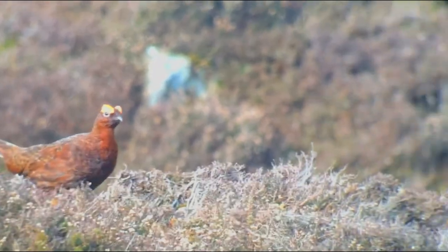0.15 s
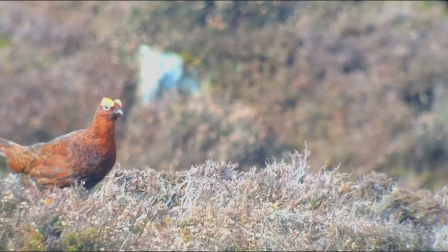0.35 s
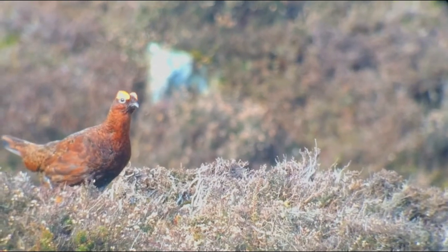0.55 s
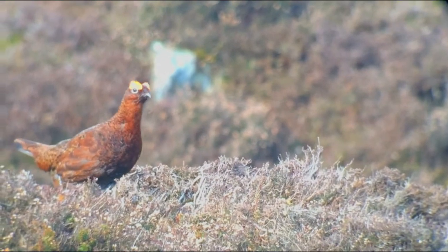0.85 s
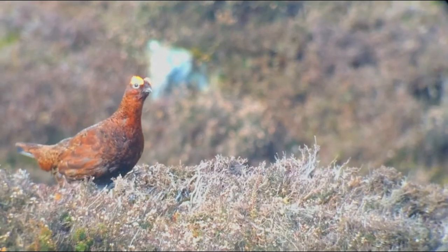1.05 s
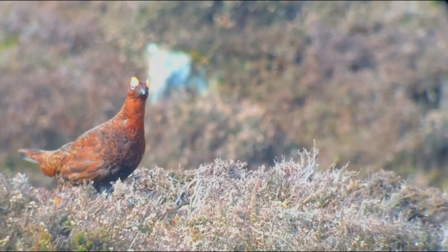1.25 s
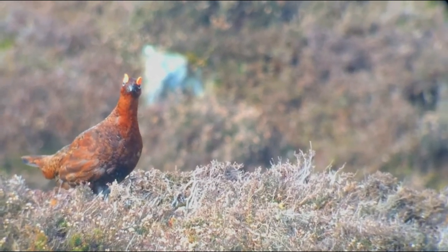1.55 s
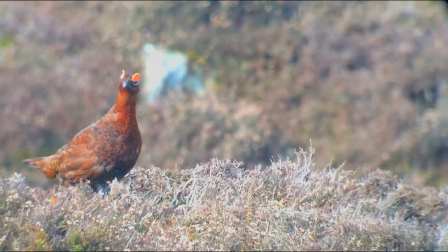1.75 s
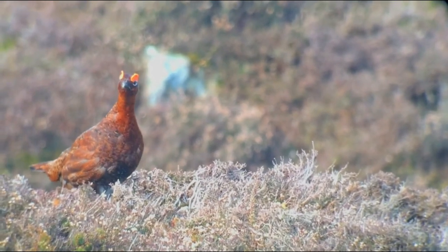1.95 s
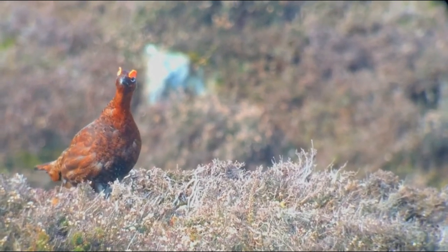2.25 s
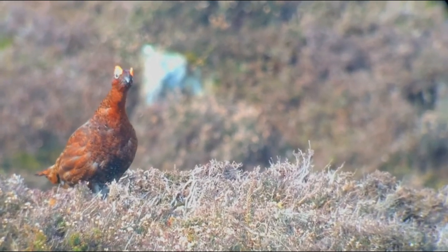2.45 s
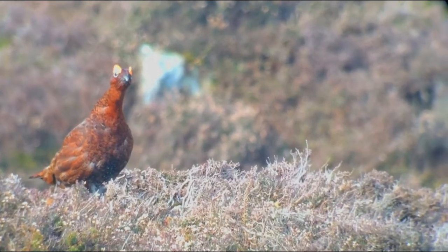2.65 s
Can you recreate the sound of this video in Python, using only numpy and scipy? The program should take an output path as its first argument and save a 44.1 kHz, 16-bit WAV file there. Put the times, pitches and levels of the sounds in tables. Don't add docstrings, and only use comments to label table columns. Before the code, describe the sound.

Short throaty clucks from a grouse, first isolated and sharp, later soft and closer together, outdoors in gusty wind, with low microphone thumps, a burst of handling knocks and creaks midway, and thin hiss.

```python
import sys
import numpy as np
from scipy import signal
from scipy.fft import rfft, irfft
from scipy.io import wavfile
from scipy.ndimage import uniform_filter1d, map_coordinates

SR = 44100
rng = np.random.default_rng(int(sys.argv[2]) if len(sys.argv) > 2 else 0)


def linear_from_db(decibels):
    return 10 ** (np.asarray(decibels, float) / 20)


def int16_out(signal):
    q = np.round(np.clip(np.atleast_2d(signal).T, -1, 1) * 32767)
    wavfile.write(sys.argv[1], SR, q.astype(np.int16))


N = 123479

# (time [s], level [dB])
GUSTS = [(0.0, -47.5), (0.19, -48.5), (0.47, -47.5), (0.67, -51.5), (0.93, -52.5), (1.15, -50.5),
         (1.4, -50), (1.52, -48.5), (1.7, -48), (1.81, -50.5), (1.92, -48), (2.0, -37.5), (2.04, -49.5),
         (2.12, -42.5), (2.24, -40.5), (2.33, -49), (2.63, -53), (2.8, -54)]
# (frequency [Hz], density [dB per Hz])
RUMBLE_SPECTRUM = [(8.8, -56), (15, -23.5), (38, -8), (85, 1.5), (173, -7.5), (432, -25), (491, -23),
                   (568, -44.5), (700, -26.5), (910, -56.5), (1540, -120)]
# (frequency [Hz], density [dB per Hz])
ROAR_SPECTRUM = [(200, -0.5), (450, -13.5), (640, -8), (790, 2.5), (960, -10), (1150, -22.5), (1400, -27),
                 (2200, -45.5)]
# (frequency [Hz], width [Hz], level [dB])
MOANS = [
    (75.4, 9.1, -4),
    (131.46, 13.7, -5),
]
LUMP_DB, ROAR_DB, ROAR_FOLLOW_DB_PER_DB = 4.5, -55, 0.26

# (frequency [Hz], density [dB per Hz])
HISS_SPECTRUM = [(880, -30), (1500, -1), (2100, -2.5), (2540, -3.5), (2740, -2.5), (6500, -6.5),
                 (8450, -33), (14300, -120)]
# (frequency [Hz], density [dB per Hz])
HISS_TOP_SPECTRUM = [(6500, -2), (7900, 6), (8300, -3), (11800, 2), (12300, -3.5), (13600, 1.5),
                     (15300, -6)]
WHINE_HZ = (15000, 3698)
WHINE_DB = (-90, -95)
HISS_DB, HISS_TOP_DB = -76, -74

# (time [s], level [dB], frequency [Hz])
THUMPS = [(0.149, -42.5, 75), (0.225, -36, 56), (0.248, -41, 69), (0.284, -53, 55), (.35, -35, 109),
          (0.401, -36, 172), (0.542, -36, 168), (0.422, -29.5, 85.5), (0.579, -29, 110),
          (0.893, -45.5, 180), (1.032, -26.5, 151), (1.046, -23, 82.5), (1.332, -29.5, 72.6),
          (1.351, -42, 109), (1.43, -32.5, 68.5), (1.458, -20, 74.6), (1.49, -31, 62.4), (1.514, -38, 91),
          (1.574, -31, 66), (1.599, -31, 89.5), (1.614, -24, 88), (1.631, -31, 60.4), (1.784, -35.5, 57),
          (1.968, -30, 59.5), (1.987, -29.5, 109), (2.008, -27, 81), (2.026, -37.5, 70), (2.07, -31, 108),
          (2.105, -22, 123), (2.131, -28.5, 84), (2.166, -31, 60.5), (2.18, -31, 81.6), (2.197, -27, 150),
          (2.22, -33.5, 100), (2.25, -29.5, 77), (2.284, -34, 68.5)]
# (frequency [Hz], density [dB per Hz])
PUFF_SPECTRUM = [(110, 4), (170, -3), (300, -10), (500, -24), (750, -29)]
PUFF_DB = -12.5

# (time [s], level [dB], length [s])
TICKS = [(.1595, -46.5, 0.0033), (0.163, -45.5, 0.0022), (0.17, -52, .003), (0.174, -50.5, 0.0024),
         (0.179, -59, 0.0033), (0.182, -57, .002), (.188, -66, .006), (0.2864, -54.5, 0.0036),
         (0.29, -55, 0.002), (0.294, -60, .002), (0.313, -62, 0.002)]
# (frequency [Hz], density [dB per Hz])
TICK_SPECTRUM = [(880, -30), (1730, -4.5), (2600, -22), (4200, -14.5), (5600, -20), (7300, -7.5),
                 (8500, -15), (9600, -3.5), (11900, -1), (12600, -9), (15200, -20)]

# (time [s], peak [dB], struck part [Hz], loss per squared octave from it [dB])
KNOCKS = [(0.203, -56, 1400, 40), (.343, -51, 500, 5), (1.209, -53, 1000, 18), (1.236, -50, 1150, 15),
          (1.237, -37, 375, 90), (1.255, -46.5, 1150, 22), (1.272, -53, 1200, 28), (1.297, -34.5, 297, 11),
          (1.313, -36.5, 1300, 10), (1.2565, -29, 322, 124), (1.268, -37.5, 340, 90),
          (1.278, -37.5, 272, 90), (1.284, -35.5, 934, 28), (1.3195, -27.5, 605, 11),
          (1.323, -24.5, 272, 37), (1.325, -28, 630, 45), (1.331, -35.5, 410, 22), (1.339, -30, 228, 40),
          (1.361, -46.5, 900, 10), (1.367, -37, 297, 28), (1.394, -45, 740, 54), (1.5815, -35.5, 970, 23.5),
          (1.585, -42.5, 1130, 25), (1.585, -33, 382, 25), (1.994, -34, 467, 56), (2.008, -42, 765, 51),
          (2.169, -42, 860, 54), (2.337, -44, 850, 67), (2.351, -40.5, 890, 60), (2.368, -46.5, 940, 72),
          (2.437, -45, 860, 64), (2.466, -46.5, 870, 60), (2.482, -46.5, 950, 70)]
# (frequency [Hz], level [dB], T60 [s])
BODY_MODES = [(275, 0, .035), (328, 0, .04), (380, 0, .035), (500, -3, .03), (614, 0, .045),
              (750, -2, .022), (870, -2, .022), (1040, 0, .022), (1250, -2, .018), (1470, -3, .018),
              (1700, -8, .014)]

# (time [s], length [s], level [dB], lowest pitch [Hz], share spent falling [0..1])
WHISTLES = [
    (0.345, 0.133, -71.5, 2880, 0.19),
    (0.731, 0.16, -70.5, 2890, 0.3),
    (1.176, 0.11, -73, 2920, .25),
    (1.262, 0.092, -78, 3110, .05),
    (1.708, 0.088, -78.5, 2800, 0.42),
]
# (time [s], length [s], level [dB], from [Hz], to [Hz])
FAR_WHISTLES = [
    (1.625, .055, -78, 2600, 2420),
]
FALL_HZ_PER_S, CLIMB_HZ = 9700, 520

# (time [s], length [s], level [dB])
SCRAPES = [
    (0.491, 0.083, -50),
    (1.232, 0.17, -48.5),
    (1.893, 0.16, -52.5),
    (2.06, 0.22, -53),
    (2.311, 0.14, -56.5),
]
# (frequency [Hz], density [dB per Hz])
SCRAPE_SPECTRUM = [(140, -0.5), (330, -4), (1100, -14), (1900, -48)]
GRAIN_DB = 3.0

# (time [s], length [s], level [dB], throat note [Hz], brightness [dB])
SHARP_CLUCKS = [
    (0.7055, 0.018, -21, 794, -4.5),
    (0.724, 0.011, -47, 770, 4),
    (1.499, 0.0091, -34.5, 794, -7.5),
    (1.7386, 0.015, -24, 788.5, 11),
    (1.805, 0.014, -46, 783, 6),
]
# (time [s], length [s], level [dB], throat note [Hz])
SOFT_CLUCKS = [(1.684, 0.042, -49, 795), (1.944, 0.036, -45, 807), (2.093, 0.029, -56.5, 811),
               (2.143, 0.04, -39, 819.5), (2.275, 0.041, -42.5, 818), (2.389, 0.036, -41.5, 828),
               (2.483, 0.04, -39, 813), (2.577, 0.0201, -40.5, 819), (2.657, 0.023, -41.5, 798),
               (2.729, 0.025, -44, 798), (2.757, 0.026, -51.5, 812)]
# (multiple of a third of the note [-], level [dB])
SHARP_VOICE = [(1, -16.5), (1.45, -17), (2, -20.5), (3, 0), (4, -19), (4.6, -28), (5.6, -36.5), (6.8, -48),
               (7.6, -62)]
# (multiple of a third of the note [-], level [dB])
SOFT_VOICE = [(2, -27), (2.55, -13.5), (3, 1.5), (3.5, -19), (4, -28), (6, -36.5), (9, -45), (15.6, -46)]
# (frequency [Hz], density [dB per Hz])
HAZE_SPECTRUM = [(1000, 10.5), (1700, -7), (2500, -13), (3000, -17.5), (4300, -11.5)]
ECHO_DB, ECHO_T60_S = -15, 0.091

SNAP_S = (.707, 1.286, 1.3195, 1.328, 1.498, 1.738)
SNAP_DB = (-74, -55, -43, -46, -66, -50)

# (time [s], length [s], level [dB], frequency [Hz])
CREAKS = [
    (1.239, 0.05, -37.5, 350),
    (1.275, 0.11, -40.5, 148),
    (2.125, 0.03, -47.5, 504),
    (2.343, 0.052, -52.5, 520),
    (2.41, 0.16, -58, 517),
]


def evened(x):
    return x / np.sqrt(np.mean(x ** 2) + 1e-20)


def add(mix, s, sound):
    part = mix[round(s * SR):][:len(sound)]
    part += sound[:len(part)]


def colour(x, spectrum):
    hz = np.fft.rfftfreq(len(x), 1 / SR)
    f, db = np.transpose(spectrum)
    gain_db = np.interp(np.log(hz + 1), np.log(f + 1), db, left=-90, right=-90)
    return evened(irfft(rfft(x) * linear_from_db(gain_db), len(x)))


def resonate(x, hz, width_hz):
    turn = np.exp(2j * np.pi * hz * np.arange(len(x)) / SR)
    r = np.exp(-np.pi * width_hz / SR)
    return 2 * (turn * signal.lfilter([1 - r], [1, -r], x / turn)).real


def wander(per_s):
    knots = rng.standard_normal(400)
    return evened(map_coordinates(knots, [np.arange(N) / SR * per_s], order=3))


def progress(length_s):
    return np.arange(0, length_s, 1 / SR) / length_s


def wind():
    s, db = np.transpose(GUSTS)
    gust_db = np.interp(np.arange(N) / SR, s, db)
    rumble = colour(rng.standard_normal(N) * linear_from_db(LUMP_DB * wander(25.39)), RUMBLE_SPECTRUM)
    air = rng.standard_normal(N) * linear_from_db(3.6 * wander(13))
    for hz, width_hz, moan_db in MOANS:
        hum = resonate(resonate(air, hz, width_hz), hz, 2 * width_hz)
        rumble = rumble + linear_from_db(moan_db) * evened(hum)
    roar = colour(rng.standard_normal(N) * linear_from_db(0.4 * wander(60) + 0.5 * wander(9.73)), ROAR_SPECTRUM)
    roar_db = ROAR_DB + ROAR_FOLLOW_DB_PER_DB * (gust_db - db.mean())
    return linear_from_db(gust_db + 1.5) * rumble + linear_from_db(roar_db) * roar


def hiss():
    t = np.arange(N) / SR
    flicker = linear_from_db(0.27 * wander(29) + 1.4 * wander(1.58))
    noise = linear_from_db(HISS_DB) * colour(rng.standard_normal(N), HISS_SPECTRUM)
    noise = noise + linear_from_db(HISS_TOP_DB) * colour(rng.standard_normal(N), HISS_TOP_SPECTRUM)
    whine = sum(linear_from_db(db + 4.5) * np.sin(2 * np.pi * hz * t) for hz, db in zip(WHINE_HZ, WHINE_DB))
    return flicker * noise + whine


def thumps():
    out, gate = np.zeros(N), np.zeros(N)
    for s, db, hz in THUMPS:
        u = np.arange(-1.5, 3, hz / SR)
        ends = np.sqrt(np.hanning(len(u)))
        swell = np.exp(-np.where(u < 0, 8.4 * u * u, 1.03 * u))
        swing = np.cos(2 * np.pi * u / (1 + 0.12 * abs(u)))
        add(out, s - 1.497 / hz, linear_from_db(db) * ends * swell * swing)
        add(gate, s - 1.53 / hz, linear_from_db(db + PUFF_DB) * ends * np.exp(-0.7 * u * u))
    return out + gate * colour(rng.standard_normal(N), PUFF_SPECTRUM)


def ticks():
    gate, t = np.zeros(N), np.arange(3000) / SR
    for s, db, length_s in TICKS:
        add(gate, s, linear_from_db(db - 12 * t / length_s) * np.minimum(t / 0.0006, 1))
    return gate * colour(rng.standard_normal(N), TICK_SPECTRUM)


def knocks():
    out, t = np.zeros(N), np.arange(3000) / SR
    attack = np.sin(np.pi / 2 * np.minimum(t / 0.0029, 1)) ** 2
    for s, db, part_hz, reach_db in KNOCKS:
        ring = np.zeros(len(t))
        for hz, mode_db, t60_s in BODY_MODES:
            level_chance, pitch_chance = rng.random(2) - 0.5
            start_db = mode_db - reach_db * np.log2(hz / part_hz) ** 2 + 0.95 * level_chance
            mode_hz = hz * (1 + 0.064 * pitch_chance)
            ring += linear_from_db(start_db - 60 * t / t60_s) * np.sin(2 * np.pi * mode_hz * t)
        ring = ring * attack
        add(out, s, linear_from_db(db) * ring / abs(ring).max())
    return out


def wader():
    out, flutter = np.zeros(N), linear_from_db(1.7 * wander(45))
    for s, length_s, db, low_hz, dip in WHISTLES:
        u = progress(length_s)
        fall_hz = FALL_HZ_PER_S * dip * length_s * np.clip(1 - u / dip, 0, 1) ** 1.6
        climb_hz = CLIMB_HZ * length_s / 0.165 * np.clip((u - dip) / (1 - dip), 0, 1) ** 1.2
        tone = np.sin(2 * np.pi * np.cumsum(low_hz + fall_hz + climb_hz) / SR)
        add(out, s, linear_from_db(db + 7.5 - 10.6 * u) * np.sin(np.pi * u ** 0.97) ** 0.72 * tone)
    for s, length_s, db, from_hz, to_hz in FAR_WHISTLES:
        u = progress(length_s)
        tone = np.sin(2 * np.pi * np.cumsum(from_hz + (to_hz - from_hz) * u) / SR)
        add(out, s, linear_from_db(db) * np.sin(np.pi * u) * tone)
    return out * flutter


def scrapes():
    gate = np.zeros(N)
    for s, length_s, db in SCRAPES:
        add(gate, s, linear_from_db(db) * np.sqrt(np.hanning(round(length_s * SR))))
    return gate * colour(rng.standard_normal(N) * linear_from_db(GRAIN_DB * wander(130)), SCRAPE_SPECTRUM)


def cluck(length_s, db, note_hz, bright_db, peak, voice, jitter, wobble_db, haze_db, sag, swell):
    u = progress(length_s)
    effort = np.sin(np.pi * u ** (np.log(0.5) / np.log(peak))) ** swell
    shake = uniform_filter1d(rng.standard_normal(4000), size=120)
    shake = evened(uniform_filter1d(shake, size=120))
    pulse_hz = note_hz / 3 * (1 + sag * (peak - u)) * (1 + jitter * shake[:len(u)])
    turns = np.cumsum(pulse_hz) / SR
    sound = np.zeros(len(u))
    for k, partial_db in voice:
        start = rng.random() * (k % 1 > 0)
        level_db = partial_db + bright_db * np.clip(k - 4, 0, 1)
        sound += linear_from_db(level_db) * np.sin(2 * np.pi * (k * turns + start))
    sound += linear_from_db(haze_db) * colour(rng.standard_normal(4000), HAZE_SPECTRUM)[:len(u)]
    return 2 * linear_from_db(db + wobble_db * shake[-len(u):]) * effort * sound


def grouse():
    out = np.zeros(N)
    for s, *row in SHARP_CLUCKS:
        add(out, s, cluck(*row, peak=0.31, voice=SHARP_VOICE, jitter=0.014, wobble_db=-0.66,
                          haze_db=-46.5, sag=0.045, swell=2.0))
    for s, *row in SOFT_CLUCKS:
        add(out, s, cluck(*row, bright_db=0, peak=0.53, voice=SOFT_VOICE, jitter=0.026, wobble_db=1.5,
                          haze_db=-34.5, sag=0.025, swell=1.42))
    t = np.arange(8000) / SR
    scatter = rng.standard_normal(len(t)) * linear_from_db(-60 * t / ECHO_T60_S) * (t > 0.008)
    echo = signal.oaconvolve(out, scatter / np.linalg.norm(scatter))[:N]
    return out + linear_from_db(ECHO_DB) * echo


def snaps():
    gate, t = np.zeros(N), np.arange(3000) / SR
    for s, db in zip(SNAP_S, SNAP_DB):
        add(gate, s, linear_from_db(db - 60 * t / 0.014) * np.minimum(t / 0.00013, 1))
    return gate * colour(rng.standard_normal(N), [(1200, 18), (4000, -8), (9000, -7.5), (15300, -11)])


def creaks():
    out = np.zeros(N)
    for s, length_s, db, hz in CREAKS:
        noise = rng.standard_normal(9000)[:len(progress(length_s))]
        rub = evened(resonate(resonate(noise, hz, 38), hz, 110))
        add(out, s, linear_from_db(db) * np.sqrt(np.hanning(len(rub))) * rub)
    return out


def scene():
    birds = grouse() + wader()
    air = wind() + thumps()
    contacts = knocks() + creaks() + ticks() + snaps()
    return (birds + air + contacts + hiss() + scrapes())[None]


def top_cut(x):
    return signal.sosfilt(signal.butter(12, 15450, fs=SR, output="sos"), x)


def record(dry):
    low_pass = signal.firwin(801, 15480, window=("kaiser", 9), fs=SR)
    mix = signal.oaconvolve(dry, low_pass[None], "same")
    return top_cut(mix)


dry = scene()
out = record(dry)
int16_out(out)
```